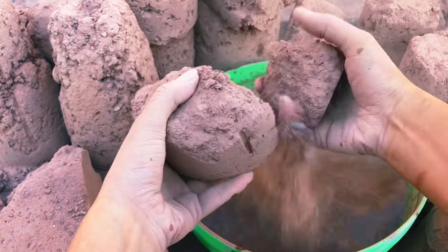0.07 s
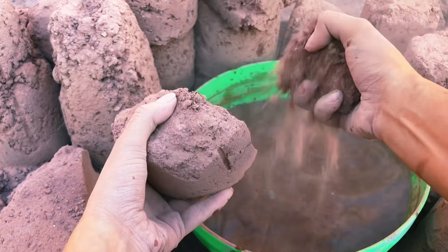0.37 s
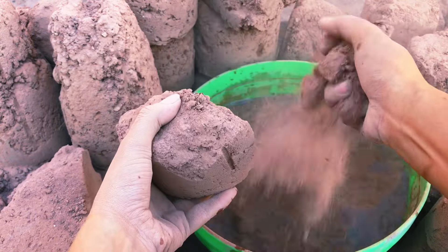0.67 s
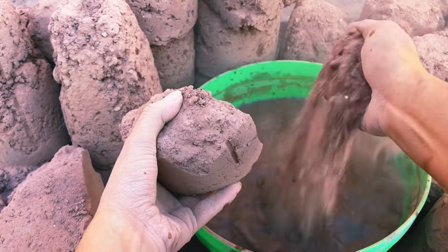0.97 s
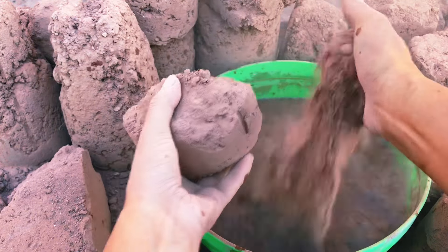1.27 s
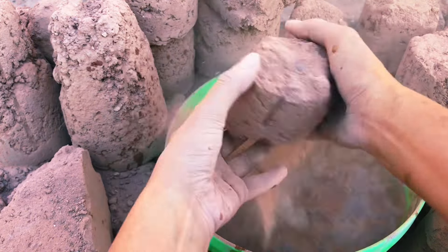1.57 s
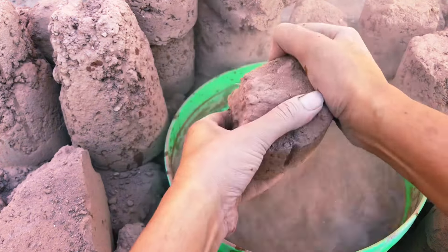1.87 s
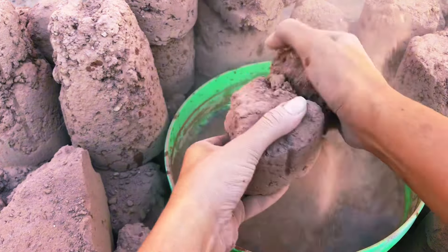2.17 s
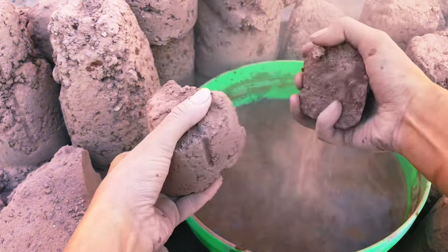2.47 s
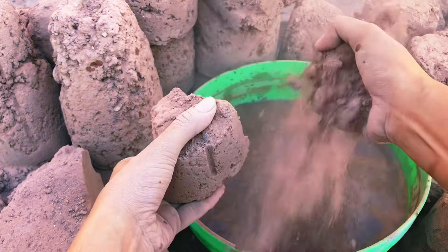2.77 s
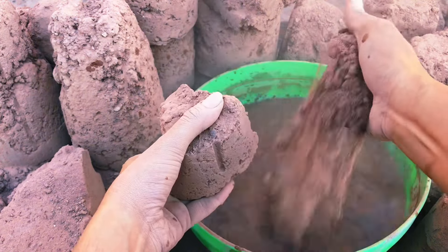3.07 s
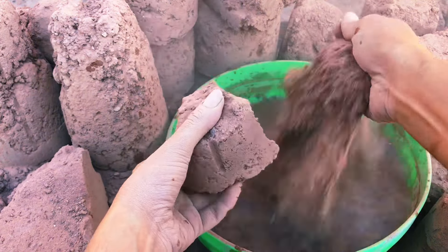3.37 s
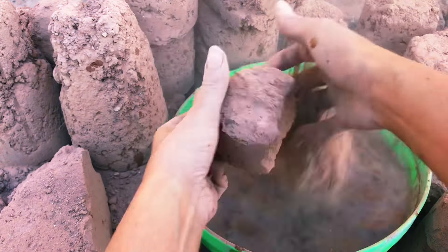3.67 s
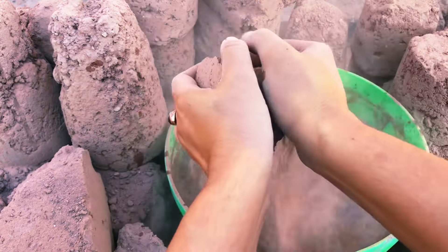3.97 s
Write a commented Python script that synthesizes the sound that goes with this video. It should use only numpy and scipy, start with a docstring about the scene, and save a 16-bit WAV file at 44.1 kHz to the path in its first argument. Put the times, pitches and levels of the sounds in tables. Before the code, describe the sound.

Gritty sand crumbles into a tub of water, hissing and pattering with small splashes.

```python
"""Dry, gritty sand pours into a plastic tub of water as two hands crush a block of it, close up.
In two long pours, coarse grains crackle, fine sand hisses and crumbs snap and tick. Small crumbs and
pebbles trap bubbles that patter and plip; loose clumps splash and heavy lumps plop open cavities.
Fingers scrape the block and a hand thumps it once. The tub adds a very short ring, and a low
rumble lies behind everything."""
import sys
import numpy as np
from scipy import signal
from scipy.fft import rfft, irfft
from scipy.io import wavfile
from scipy.ndimage import uniform_filter1d

SR = 44100
rng = np.random.default_rng(int(sys.argv[2]) if len(sys.argv) > 2 else 0)


def bounce(signal):
    """Save signal as a 16-bit WAV file at the path given by the first command-line argument."""
    frames = np.transpose(np.atleast_2d(signal))
    limited = np.clip(frames, -1, 1)
    pcm = np.round(limited * 32767).astype(np.int16)
    wavfile.write(sys.argv[1], SR, pcm)


N = 176400
TIME_S = np.arange(N) / SR


def amp(db):
    """Decibels to gain."""
    return 10 ** (np.asarray(db) / 20)


def unit_rms(x):
    """Scales to rms 1."""
    return x / np.sqrt(np.mean(x ** 2) + 1e-20)


def add(mix, start_s, sound):
    """Mixes a sound in at start_s."""
    part = mix[max(round(start_s * SR), 0):][:len(sound)]
    part += sound[:len(part)]


def colour(x, spectrum):
    """Filters x by (Hz, dB) points, to rms 1."""
    hz, db = np.transpose(spectrum)
    bins_hz = np.fft.rfftfreq(len(x), 1 / SR)
    gain = amp(np.interp(np.log(bins_hz + 1), np.log(hz), db))
    return unit_rms(irfft(rfft(x) * gain, len(x)))


def shower(grains, rate_per_s, spread_db, max_size):
    """Grains at random moments: many small, few large."""
    out = np.zeros(N)
    for grain in grains:
        hits = rng.random(N) < rate_per_s / len(grains) / SR
        sizes = np.minimum(rng.exponential(1, N)[hits], max_size)
        for start_s, db in zip(TIME_S[hits], spread_db * sizes):
            add(out, start_s, amp(db) * grain)
    return unit_rms(out)


def crack(hz, width_oct, decay_s):
    """A sharp click with a brief ragged ring around hz."""
    t = TIME_S[:1024]
    bins_hz = np.fft.rfftfreq(len(t), 1 / SR)
    log_gain = np.maximum(-.5 * (np.log2((bins_hz + 1) / hz) / width_oct) ** 2, -4.5)
    mirrored = np.concatenate([log_gain, log_gain[-2:0:-1]])
    min_phase_band = np.exp(np.conj(signal.hilbert(mirrored)))
    impact = rng.standard_normal(len(t)) * np.exp(-t / decay_s)
    impact[0] += 4
    click = np.fft.ifft(np.fft.fft(impact) * min_phase_band).real
    return click / np.linalg.norm(click)


def bubble(hz, decay_s, glide, rise_s=.00028):
    """A damped ring, as of an air pocket; positive glide raises the pitch."""
    t = TIME_S[:2200]
    pitch_hz = hz * (1 + glide * (np.tanh(t / (2 * decay_s)) * 2 - .5))
    envelope = (1 - np.exp(-t / rise_s)) * np.exp(-t / decay_s)
    return envelope * np.sin(2 * np.pi * np.cumsum(pitch_hz) / SR)


def spray(click, decay_s):
    """A dying scatter of tiny impacts, each sounding the click."""
    t = TIME_S[:2200]
    noise, jitter = rng.standard_normal((2, len(t)))
    return signal.fftconvolve(noise * abs(jitter) * np.exp(-t / decay_s), click)


def bursts(rows, spectrum, roughness):
    """Dense runs of tiny impacts, each swelling and dying away."""
    envelope, t = np.zeros(N), TIME_S[:9000]
    for start_s, db, rise_s, decay_s in rows:
        swell = np.minimum(t / rise_s, 1) * np.exp(-np.maximum(t - rise_s, 0) / decay_s)
        add(envelope, start_s, amp(db) * swell)
    noise, jitter = rng.standard_normal((2, N))
    return envelope * colour(noise * abs(jitter) ** roughness, spectrum)


# Coarse grains. Each row: frequency in Hz, gain in dB.
CRACKLE_SPECTRUM = [(200, -14), (450, -6), (800, -2), (1500, 2), (2500, 0), (3600, 4), (5500, -10.5),
                    (9300, 5.5), (10600, -2), (12500, -5), (16000, -2.5)]
# Finest sand. Each row: frequency in Hz, gain in dB.
HISS_SPECTRUM = [(300, -5), (550, 5.5), (800, -3), (1500, -25.5), (3500, -5.5), (5500, 2.5), (9300, -5.5),
                 (10600, 0.5), (16000, -5.5)]


def grit():
    """Dry grains, each with its own ring, crackle over the fluttering hiss of the finest sand."""
    grains = [crack(hz, width_oct=.85, decay_s=.00035) for hz in np.geomspace(2000, 14000, 40)]
    crackle = colour(shower(grains, rate_per_s=1500, spread_db=5, max_size=4.3), CRACKLE_SPECTRUM)
    flutter_db, flutter_s = 8.5, .006
    flutter = unit_rms(uniform_filter1d(rng.standard_normal(N), int(flutter_s * SR)))
    hiss = colour(rng.standard_normal(N) * amp(flutter_db * flutter), HISS_SPECTRUM)
    return amp(-1.5) * crackle + amp(-2) * hiss


# Crumbs on water. Each row: frequency in Hz, gain in dB.
PATTER_SPECTRUM = [(200, -11), (450, -9.5), (750, -22.5), (1050, -0.5), (1400, -2.5), (1900, -1),
                   (2600, -5), (4000, -15.5), (7000, -5)]


def patter():
    """Small crumbs each trap a short-lived bubble."""
    pitches_hz, decay_cycles = np.linspace(20, 72, 40) ** 2, 2.8
    bubbles = [unit_rms(bubble(hz, decay_s=min(decay_cycles / hz, .004), glide=rng.uniform(-.1, .11)))
               for hz in pitches_hz]
    return colour(shower(bubbles, rate_per_s=800, spread_db=7.5, max_size=2.6), PATTER_SPECTRUM)


# Sand flow. Each row: time in seconds, grit gain in dB, patter gain in dB.
SAND_FLOW = [(0.0, -39.5, -42.5), (0.1, -33.5, -40), (0.14, -30.5, -32), (0.18, -38, -31.5),
             (0.23, -30.5, -40), (0.39, -39, -42.5), (0.47, -37, -42), (0.5, -37, -38), (0.56, -35.5, -43),
             (0.73, -32.5, -35.5), (0.91, -37.5, -42.5), (0.99, -34.5, -35.5), (1.13, -36.5, -39),
             (1.2, -32, -32.5), (1.24, -33.5, -33), (1.35, -35, -31), (1.39, -40, -46.5),
             (1.45, -30.5, -33.5), (1.49, -38, -36), (1.55, -34, -35.5), (1.72, -41, -58),
             (1.95, -49.5, -50), (2.12, -48, -54), (2.18, -40, -48), (2.25, -48.5, -51), (2.38, -40.5, -45),
             (2.42, -40, -67), (2.56, -51, -50), (2.61, -44.5, -43), (2.69, -32.5, -38),
             (2.74, -41.5, -31.5), (2.83, -27, -26.5), (2.88, -36, -40), (2.94, -35.5, -41),
             (3.0, -38, -29), (3.08, -30, -33.5), (3.11, -42.5, -38), (3.24, -40.5, -43.5),
             (3.34, -32.5, -30.5), (3.61, -33, -38), (3.67, -41, -44), (3.75, -29.5, -34.5),
             (3.84, -44.5, -40.5), (4.0, -40, -43.5)]


def pour():
    """Grit and patter rise and fall with the flow of sand."""
    times_s, grit_db, patter_db = np.transpose(SAND_FLOW)
    grit_gain = amp(np.interp(TIME_S, times_s, grit_db))
    patter_gain = amp(np.interp(TIME_S, times_s, patter_db))
    return grit_gain * grit() + patter_gain * patter()


# Background rumble. Each row: frequency in Hz, gain in dB.
RUMBLE_SPECTRUM = [(20, -40), (33, -32), (48, -7.5), (62, -4.5), (84, -3), (94, -2.5), (108, 1), (125, -6),
                   (165, -14), (190, -14), (220, -8), (270, -17), (420, -21), (800, -32.5), (3000, -37.5)]
# Its slow swell. Each row: time in seconds, relative level in dB.
RUMBLE_DRIFT = [(0, 0), (1.0, -0.5), (1.8, 0), (2.2, -0.5), (2.8, 1.5), (3.15, -3), (3.55, 0.5), (4, -1)]


def rumble():
    """Low background noise that swells slowly."""
    drift_db = np.interp(TIME_S, *np.transpose(RUMBLE_DRIFT))
    return amp(drift_db - 33) * colour(rng.standard_normal(N), RUMBLE_SPECTRUM)


# Crumbs. Each row: start in seconds, relative level in dB, centre frequency in Hz.
CRUMB_TICKS = [(0.0419, -13, 8300), (0.1238, -22.5, 4360), (0.1721, -20, 4660), (0.225, -10.5, 7700),
               (0.2271, -20.5, 6240), (0.2815, -14.5, 8200), (0.373, -25, 9800), (0.5303, -21, 11910),
               (0.5824, -18, 3960), (0.7332, -19, 6660), (0.776, -17, 8750), (0.79, -24, 6090),
               (0.7995, -3, 6900), (0.8737, -4, 3960), (0.9391, -11.5, 3980), (0.979, -16, 3140),
               (1.0207, -10.5, 5500), (1.0277, -13, 7500), (1.0461, -22, 5210), (1.0558, -18, 6540),
               (1.1387, -23, 6720), (1.155, -16.5, 4160), (1.1842, -19, 6260), (1.1902, -10, 7500),
               (1.2006, -13.5, 8400), (1.2058, -34, 3270), (1.217, -15.5, 3640), (1.3368, -6.5, 10300),
               (1.4409, -19, 5900), (1.4502, -17.5, 5570), (1.52, -12.5, 8670), (1.6188, -24, 3500),
               (2.1576, -21.5, 5200), (2.185, -18, 11500), (2.5207, -20.5, 3380), (2.5679, -26, 5740),
               (2.8047, -11.5, 4220), (2.8164, -19, 5180), (2.8483, -13.5, 4920), (2.8528, -11.5, 9190),
               (2.9143, -12.5, 3280), (2.9237, -9, 8400), (3.0049, -15, 6730), (3.015, -26, 6850),
               (3.083, -20, 5830), (3.1093, -8, 6130), (3.285, -24, 8040), (3.3221, -21, 10800),
               (3.3273, -11, 12500), (3.4316, -18.5, 7460), (3.4393, -17.5, 8430), (3.4472, -16.5, 4700),
               (3.5217, -21, 6000), (3.5362, -16, 7060), (3.6122, -16.5, 6600), (3.8046, -22.5, 7800)]


def crumb_ticks():
    """Each crumb snaps or hits the surface: one hard click and a trail of chips."""
    out = np.zeros(N)
    window_s = .00044  # click energy equals rms 1 over this span
    for start_s, db, hz in CRUMB_TICKS:
        click = crack(hz, width_oct=.5, decay_s=.00022) * np.sqrt(window_s * SR)
        chips = spray(crack(hz, width_oct=1, decay_s=.0001), decay_s=.0018)
        add(out, start_s, amp(db - .5) * click)
        add(out, start_s, amp(db - 3) * chips)
    return out


# Pebbles. Each row: start in seconds, relative level in dB, nominal pitch in Hz, decay in seconds.
PEBBLE_PLIPS = [(0.1234, -23, 2005, 0.0036), (0.223, -11, 1690, 0.0041), (0.248, -20, 1110, 0.0053),
                (0.2816, -20, 1400, 0.002), (0.351, -19, 1070, 0.0035), (0.374, -27, 1594, 0.0059),
                (0.5829, -20, 1170, 0.0032), (0.6085, -29.5, 1270, 0.0059), (0.627, -25.5, 1610, 0.0034),
                (0.6336, -20.5, 2750, 0.0017), (0.6522, -22.5, 980, 0.0024), (0.7335, -20.5, 1470, 0.0016),
                (0.7994, -20, 2280, 0.0014), (0.8565, -17.5, 1570, 0.0017), (0.8718, -25, 1390, 0.0015),
                (0.9738, -19, 1246, 0.0067), (0.9801, -6.5, 1470, 0.0014), (1.0064, -23, 1290, 0.0022),
                (1.015, -30, 1940, 0.0076), (1.02, -14, 1720, 0.0017), (1.0283, -18, 1780, 0.0015),
                (1.0978, -18, 1020, 0.0017), (1.1758, -26.5, 1530, 0.0039), (1.1926, -13, 1790, 0.002),
                (1.52, -19, 1820, 0.0044), (1.5664, -18.5, 1200, 0.0015), (1.6166, -21, 1944, 0.0043),
                (1.7746, -20, 1665, 0.0016), (1.898, -28, 2040, 0.0021), (1.9153, -31.5, 2400, 0.0025),
                (2.1852, -27.5, 1450, 0.0036), (2.3684, -26.5, 1844, 0.0048), (2.4492, -33, 1296, 0.01),
                (2.516, -18, 1510, 0.0011), (2.6434, -27.5, 2340, 0.0037), (2.6754, -24, 1850, 0.002),
                (2.745, -29, 1810, 0.0034), (2.8172, -15.5, 1056, 0.0027), (2.8396, -25, 2000, 0.0041),
                (2.8885, -22.5, 1810, 0.0063), (2.9143, -10.5, 1900, 0.00098), (2.9253, -27, 1590, 0.0015),
                (2.9876, -19.5, 1970, 0.0014), (3.0038, -25, 1720, 0.005), (3.015, -23, 1290, 0.0033),
                (3.1665, -25.5, 1150, 0.0029), (3.2893, -24, 1265, 0.0036), (3.414, -23.5, 1074, 0.0037),
                (3.4721, -26.5, 1010, 0.0059), (3.5187, -17, 1310, 0.0012), (3.5376, -23.5, 1080, 0.0035),
                (3.613, -19, 1080, 0.002), (3.8055, -19, 1258, 0.0038)]


def pebble_plips():
    """Each pebble traps a bubble that sags in pitch, with a little splash."""
    out = np.zeros(N)
    for start_s, db, hz, decay_s in PEBBLE_PLIPS:
        splash = spray(crack(1.02 * hz, width_oct=.95, decay_s=.0006), decay_s=.0045)
        add(out, start_s, amp(db + 6) * bubble(hz, decay_s, glide=-.06))
        add(out, start_s, amp(db - 6) * splash)
    return out


# Loose clumps. Each row: start in seconds, level in dB, rise in seconds, decay in seconds.
CLUMP_SPLASHES = [(.2235, -16.5, 0.0015, 0.0078), (.980, -23.5, 0.0011, 0.0084), (1.198, -27, 0.0031, 0.01),
                  (2.808, -34.5, 0.0038, 0.015), (2.885, -20, 0.00094, 0.016), (2.985, -26.5, 0.0057, 0.01),
                  (3.012, -18.5, 0.0033, 0.011), (3.534, -21, 0.0023, 0.0082)]
# Their splash. Each row: frequency in Hz, gain in dB.
SPLASH_SPECTRUM = [(200, -26), (500, 5.5), (750, -19), (1100, 2.5), (1450, -8), (2050, -4.5), (2700, -12.5),
                   (4000, -22), (8000, -19), (16000, -32)]


def clump_splashes():
    """Loose clumps hit the water as bursts of tiny impacts."""
    return bursts(CLUMP_SPLASHES, SPLASH_SPECTRUM, roughness=1.3)


# Heavy lumps. Each row: start in seconds, relative level in dB, nominal pitch in Hz.
LUMP_PLOPS = [(0.2284, -28, 470), (0.584, -16, 446), (0.6527, -33, 520), (0.799, -25, 443),
              (0.8748, -21, 480), (0.9401, -16, 410), (1.0984, -23.5, 490), (1.218, -30.5, 426),
              (2.81, -26, 410), (2.8883, -28.5, 583), (2.9991, -28, 513), (3.3477, -32.5, 390),
              (3.5224, -14, 430)]


def lump_plops():
    """Each lump slaps the water and opens a wide, quickly damped cavity that rises in pitch."""
    out = np.zeros(N)
    for start_s, db, hz in LUMP_PLOPS:
        slap = spray(crack(hz, width_oct=.8, decay_s=.0003), decay_s=.005)
        cavity = bubble(hz, decay_s=.003, glide=.2, rise_s=.0004)
        add(out, start_s, amp(db - 6.5) * slap)
        add(out, start_s, amp(db + 10.5) * cavity)
    return out


# Finger strokes. Each row: start in seconds, level in dB, rise in seconds, decay in seconds.
FINGER_SCRAPES = [(.491, -28.5, 0.0044, 0.032), (1.67, -35, 0.011, 0.02), (1.81, -38, .008, 0.046),
                  (1.957, -34.5, .008, 0.026), (2.022, -42, .012, 0.017), (2.355, -37.5, 0.011, 0.021),
                  (2.565, -28, 0.002, 0.022)]
# Skin on sand. Each row: frequency in Hz, gain in dB.
SCRAPE_SPECTRUM = [(300, -28), (900, 7), (2000, 6), (4000, 6), (9500, 3), (11000, 4), (16000, -35)]


def hands():
    """Fingers scrape the block, and once a hand lands on it with a soft thump."""
    out = bursts(FINGER_SCRAPES, SCRAPE_SPECTRUM, roughness=.8)
    thump = bubble(hz=235, decay_s=.0038, glide=.05, rise_s=.0016)
    add(out, start_s=1.957, sound=amp(-9.5) * thump)
    return out


def reflections(x, decay_s, delay_s=.0018):
    """Sparse echoes that die away."""
    t = TIME_S[:8000]
    taps = rng.standard_normal(len(t)) * np.exp(-t / decay_s)
    taps *= (rng.random(len(t)) < .1) & (t > delay_s)
    return signal.fftconvolve(x, taps / np.linalg.norm(taps))[:N]


def scene():
    """Sand, water and hands with the tub's ring and a faint yard echo, over the rumble; mono."""
    direct = pour() + crumb_ticks() + pebble_plips() + clump_splashes() + lump_plops() + hands()
    tub = amp(-17.5) * reflections(direct, decay_s=.0017)
    yard = amp(-30.5) * reflections(direct, decay_s=.027)
    return (direct + tub + yard + rumble())[None]


# Microphone response. Each row: frequency in Hz, gain in dB.
MIC_RESPONSE = [(20, 1), (9600, 1), (10400, -3), (12000, -0.5), (16000, -3.5)]


def record(dry):
    """The microphone softens the top octave; peaks clip at full scale, then a low-pass follows."""
    mic_gain = amp(np.interp(np.fft.rfftfreq(N, 1 / SR), *np.transpose(MIC_RESPONSE)))
    clipped = np.clip(irfft(rfft(dry) * mic_gain, N), -1, 1)
    cutoff_hz = 16000
    lowpass = signal.firwin(401, cutoff_hz, window=("kaiser", 8), fs=SR)
    return signal.oaconvolve(clipped, lowpass[None], "same")


dry = scene()
out = record(dry)
bounce(out)
```